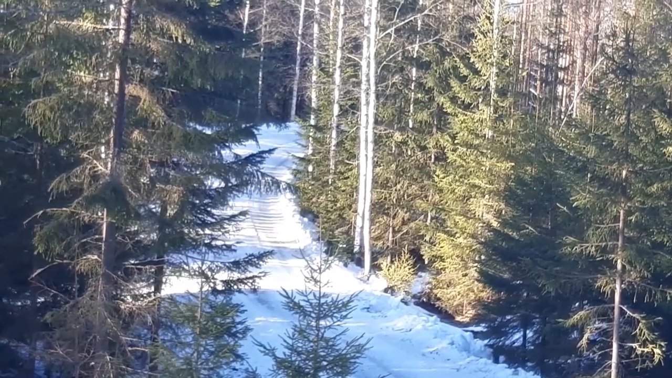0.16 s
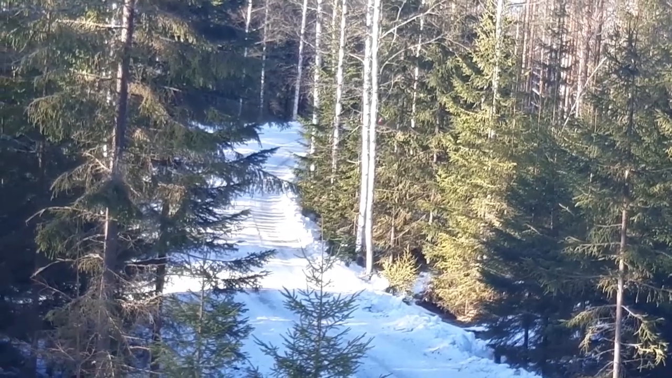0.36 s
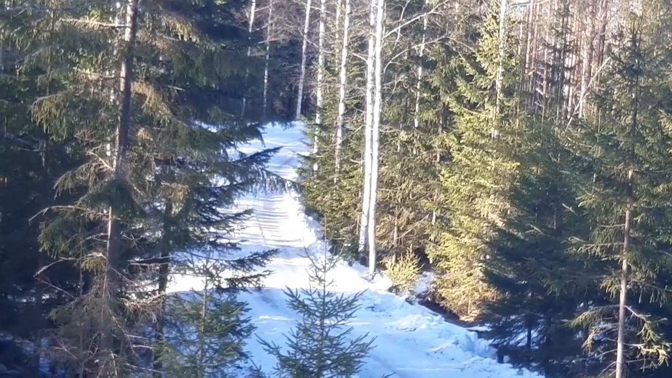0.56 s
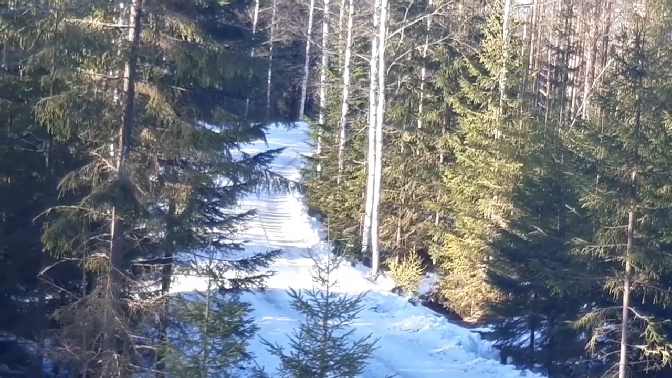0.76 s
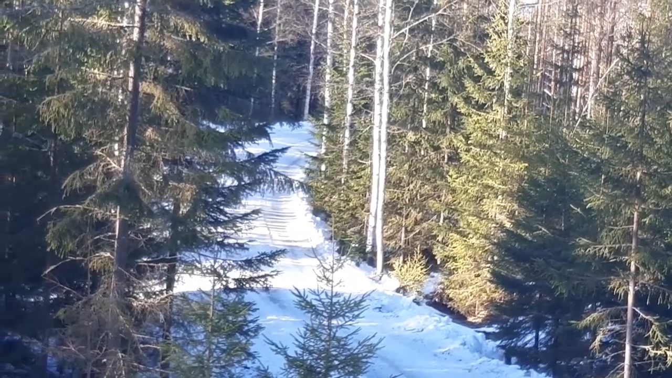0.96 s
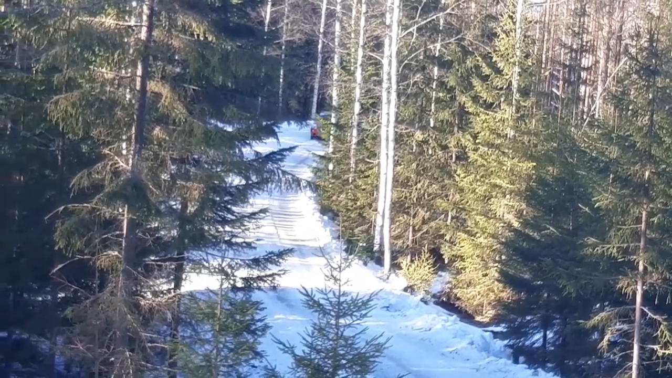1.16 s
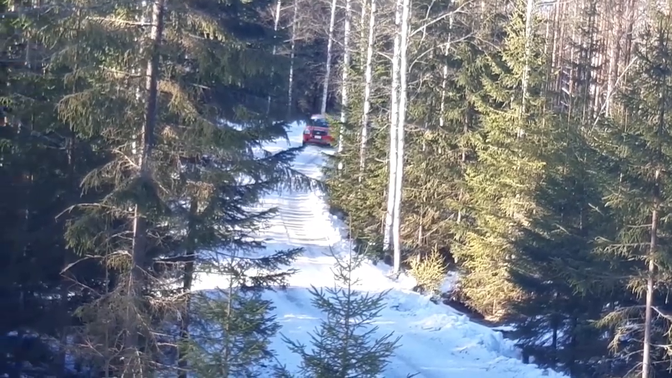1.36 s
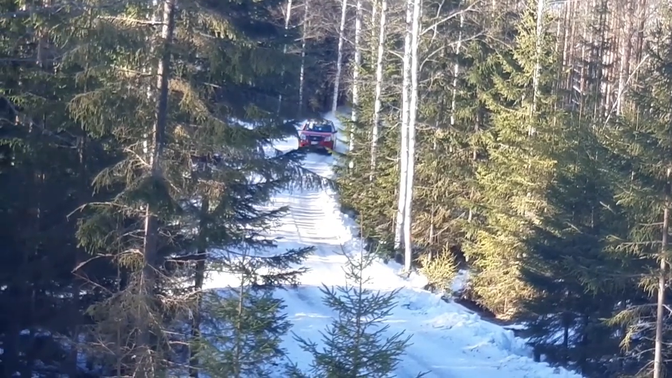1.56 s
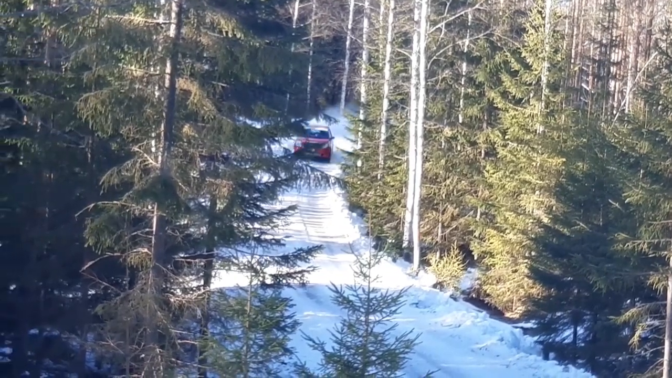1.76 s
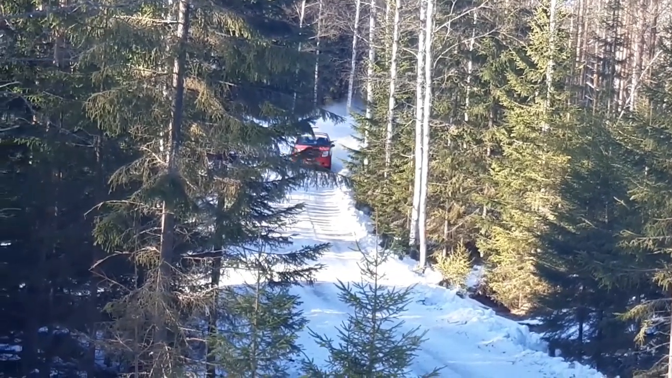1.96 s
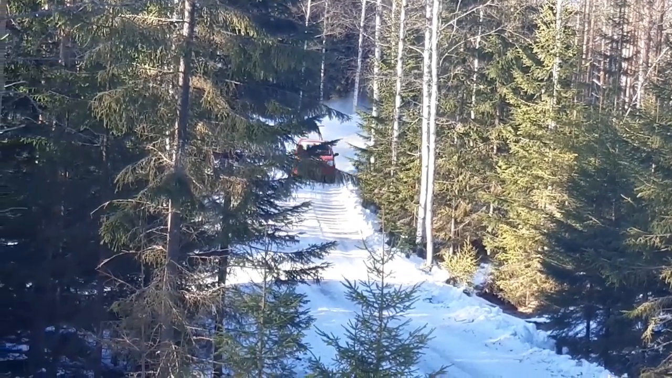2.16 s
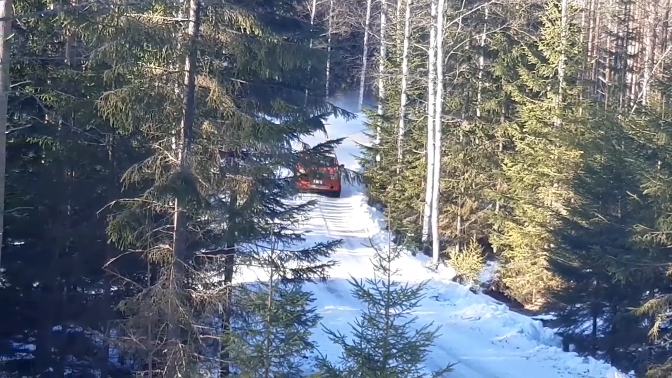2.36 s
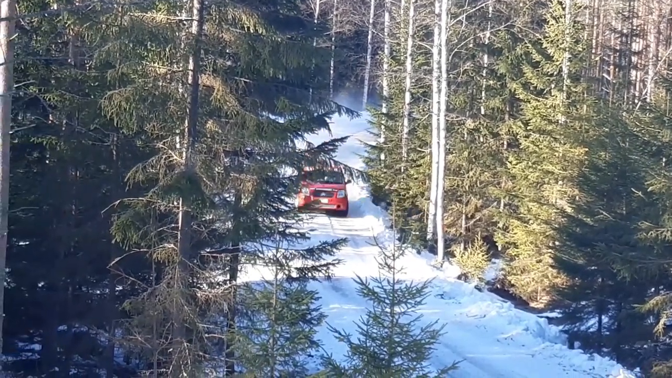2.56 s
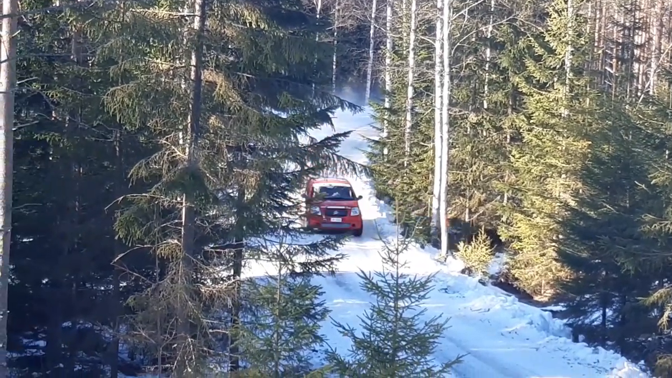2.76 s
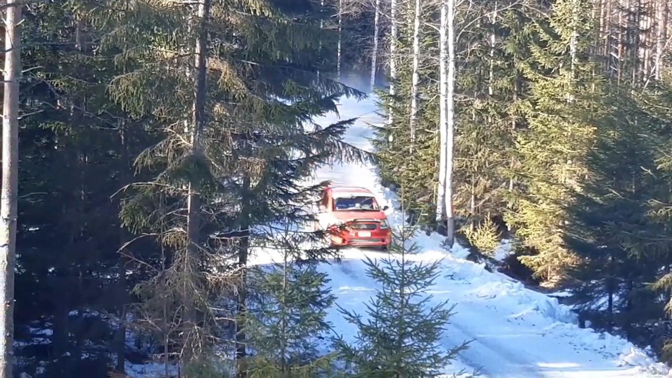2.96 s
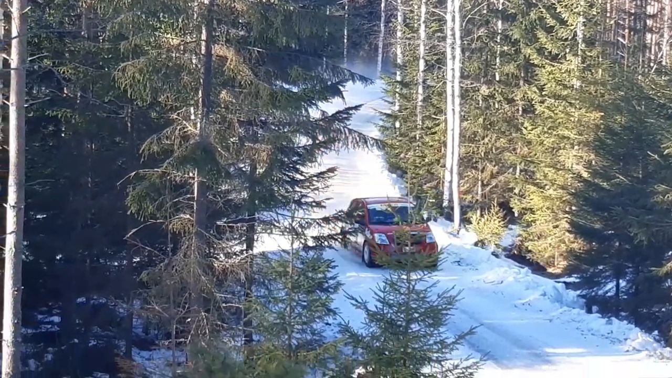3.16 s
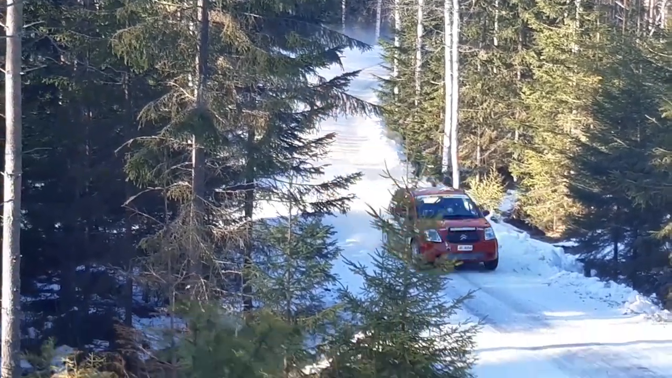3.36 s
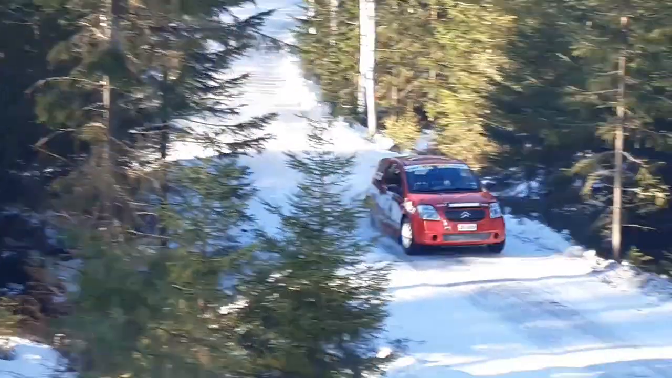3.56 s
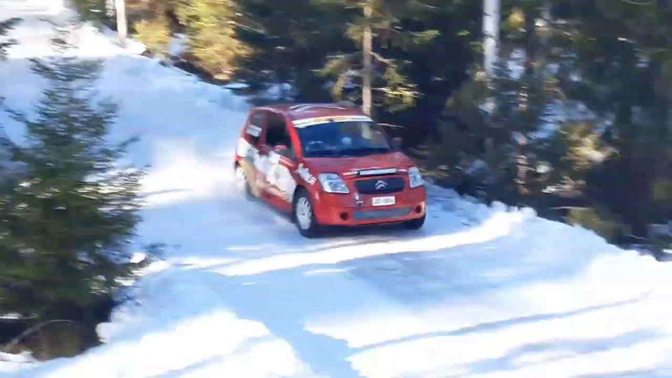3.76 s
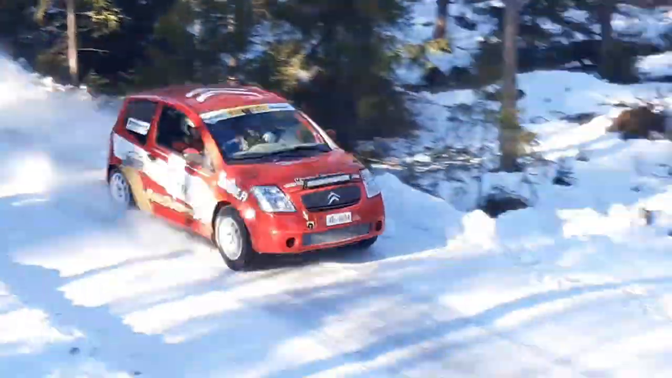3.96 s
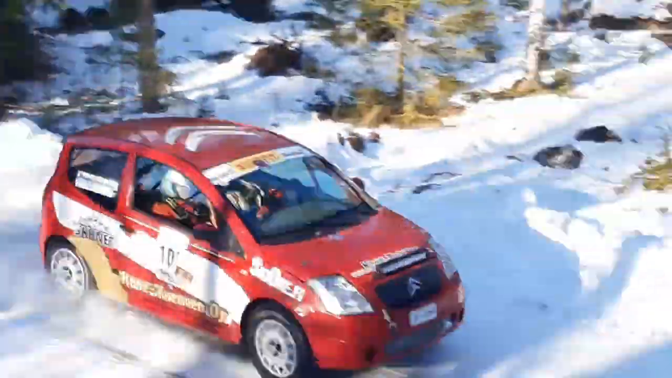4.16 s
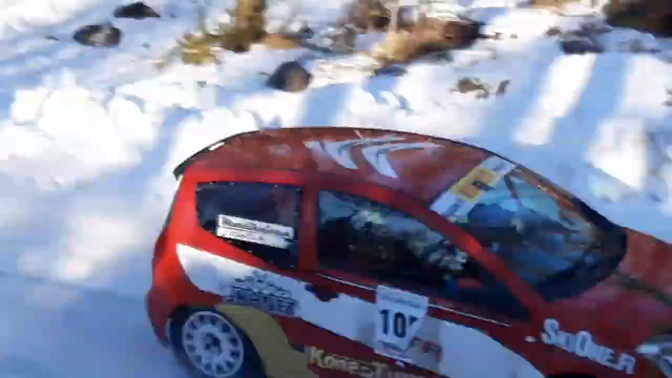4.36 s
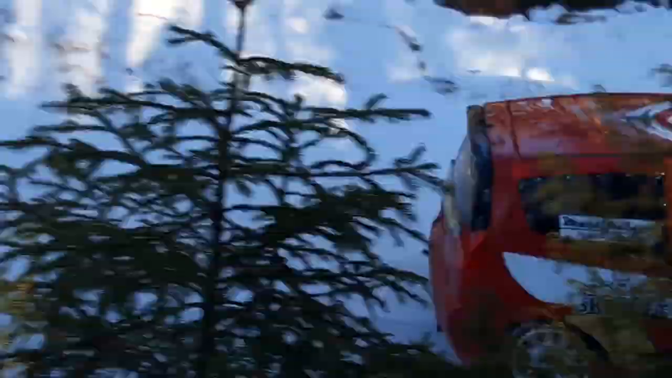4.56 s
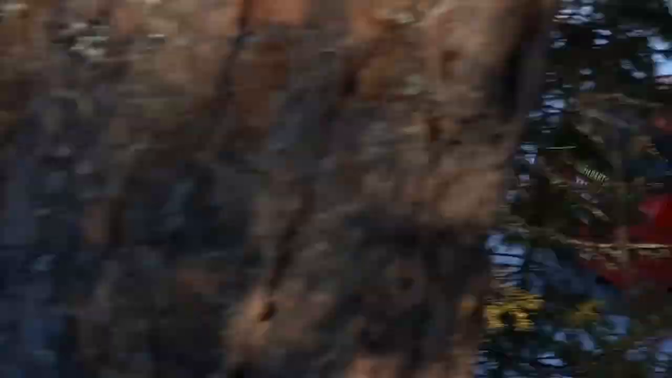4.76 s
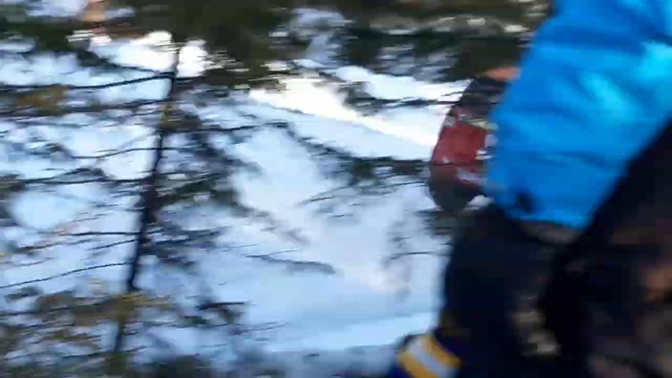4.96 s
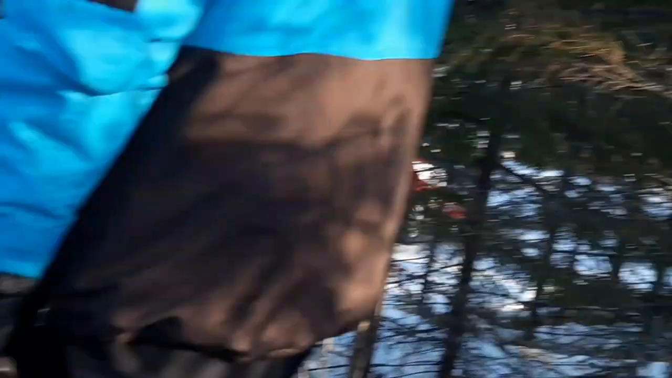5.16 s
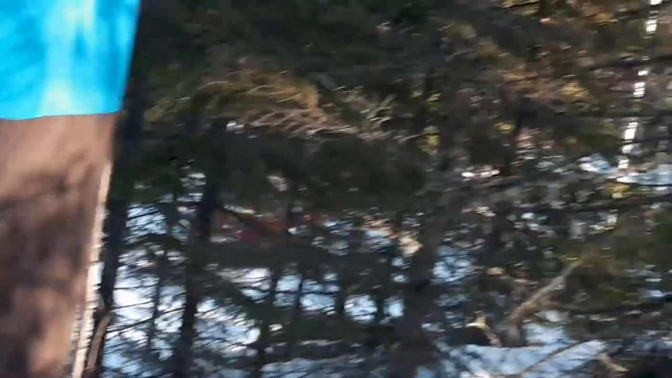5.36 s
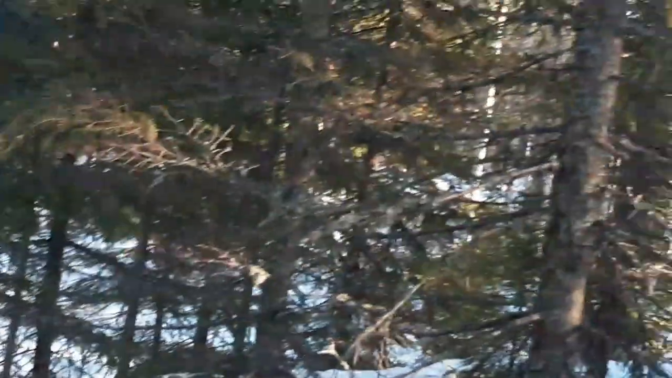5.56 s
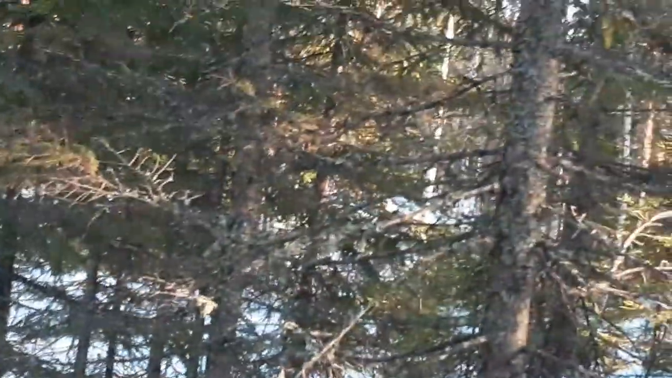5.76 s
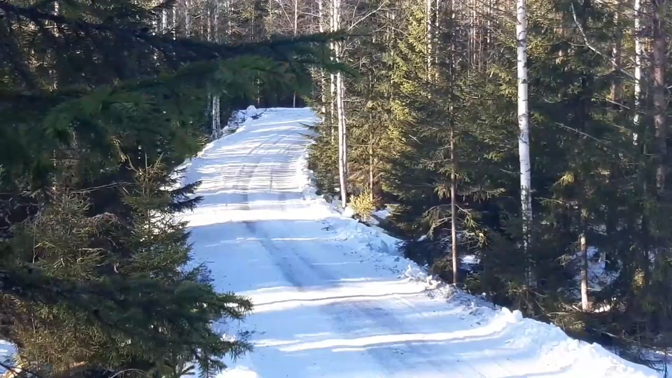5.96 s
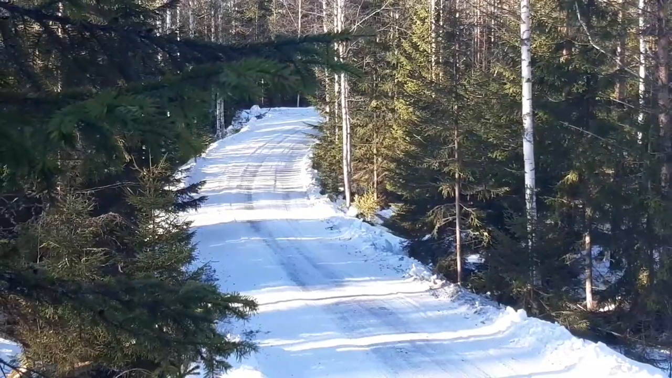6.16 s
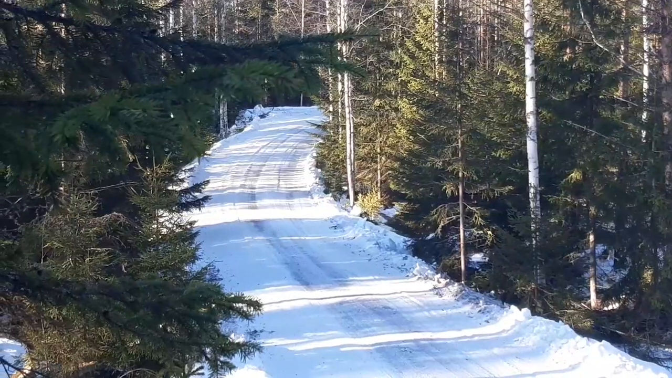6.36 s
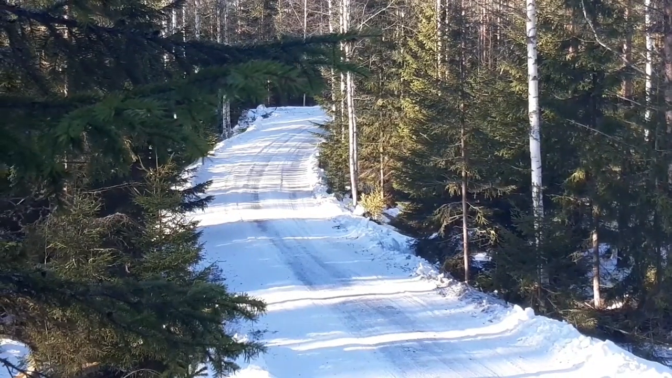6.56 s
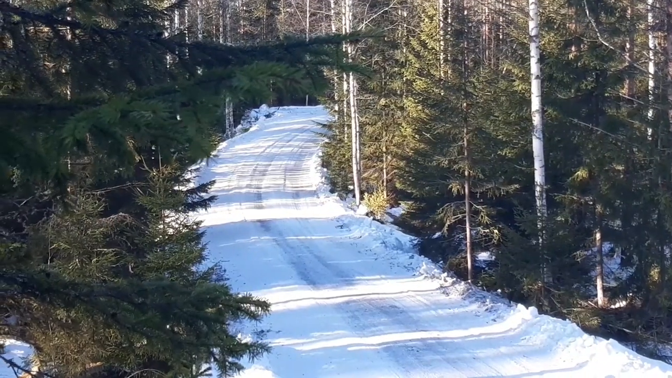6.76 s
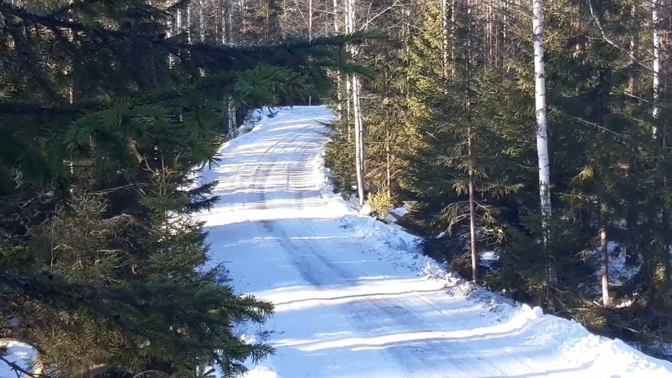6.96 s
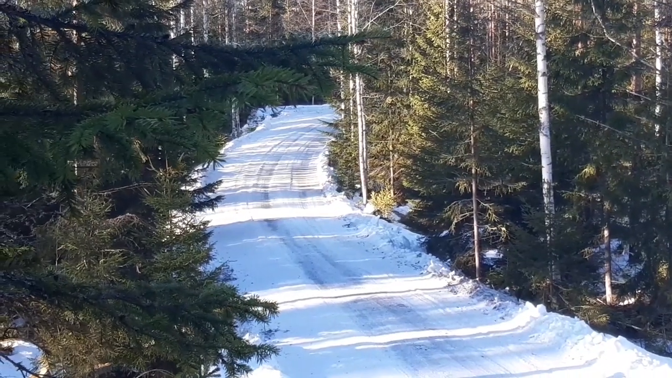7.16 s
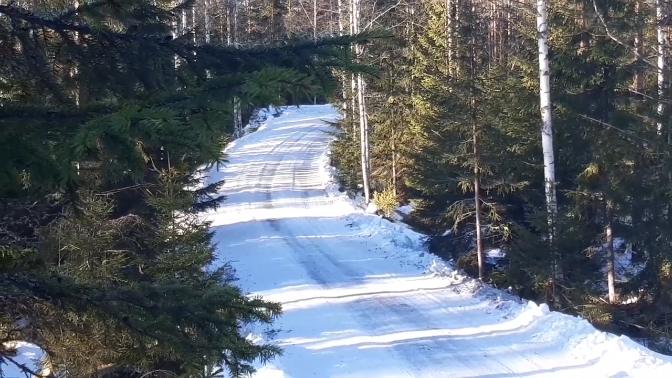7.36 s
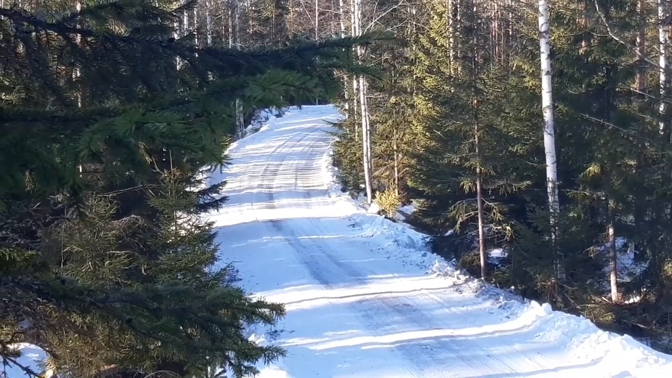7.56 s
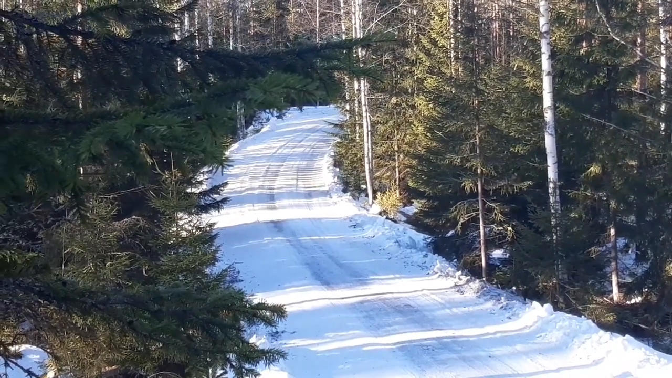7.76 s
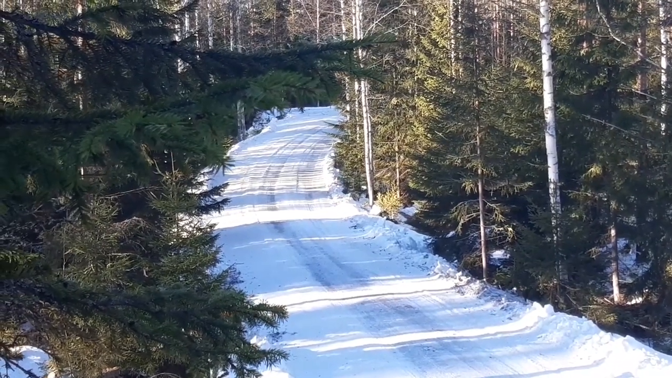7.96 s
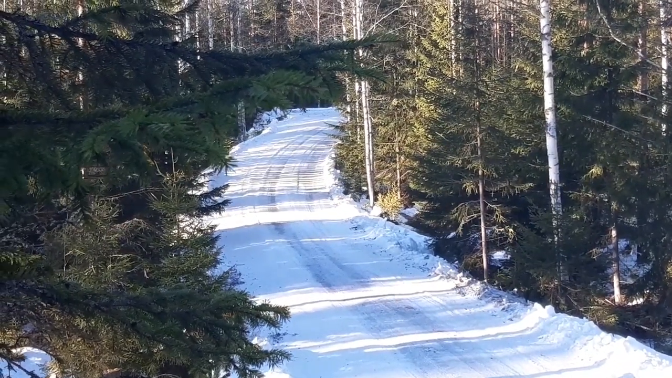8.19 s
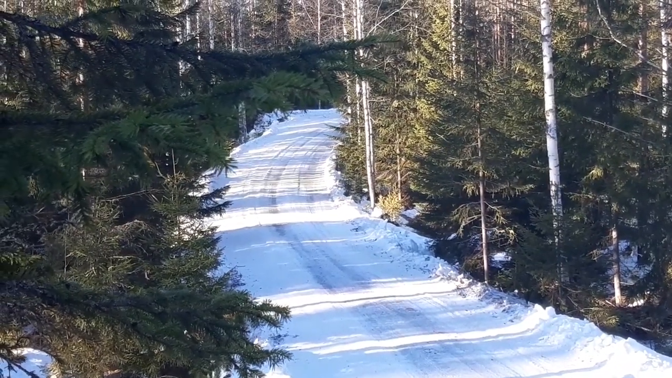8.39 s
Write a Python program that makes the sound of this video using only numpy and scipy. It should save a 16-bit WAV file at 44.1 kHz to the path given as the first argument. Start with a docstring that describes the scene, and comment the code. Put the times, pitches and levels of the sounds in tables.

```python
"""Rally car on a snowy forest road

A four-cylinder car at high revs comes up, passes close by and lifts off with exhaust pops; faint whistles at the start.
After a hard cut and a short silence, another car draws nearer, far off among the trees; clothing rustles and ticks.
Engines are sines at multiples of the firing rate plus noise roar; pops are spikes, fizz and thuds;
whistles, cloth and ticks are shaped noise. Trees, snow and road add echoes."""
import sys
import numpy as np
from scipy import signal
from scipy.io import wavfile

SR = 44100
rng = np.random.default_rng(int(sys.argv[2]) if len(sys.argv) > 2 else 0)


def log_audio(samples):
    """Write samples as a 16-bit WAV file to the path given in sys.argv[1]."""
    # one column per channel
    frames = np.atleast_2d(samples).T
    # limit to full scale, then quantise
    limited = np.clip(frames, -1, 1)
    pcm = np.round(limited * 32767).astype(np.int16)
    wavfile.write(sys.argv[1], SR, pcm)


N = 371610

# Levels are settings ahead of resonances, bounces and microphone.
# passing car, engine speed: t/s, firing rate f/Hz
PASS_FIRING_HZ = [(0, 199), (0.122, 227.3), (.25, 234.2), (.33, 223.2), (0.451, 193.3), (0.621, 170.3),
                  (0.721, 165.6), (.82, 200.6), (.95, 230.5), (1.301, 238.2), (1.5, 248.3), (1.7, 255.6),
                  (1.85, 261.7), (2.2, 261.7), (2.4, 267), (2.53, 283), (2.62, 286.4), (2.69, 284.2),
                  (2.77, 291.9), (2.85, 275.9), (2.93, 282), (3.069, 274.7), (3.33, 269.8), (3.622, 278),
                  (3.78, 291.4), (3.9, 300.8), (4.06, 298.3), (4.19, 305), (4.28, 295.4), (4.38, 279),
                  (4.5, 271.6), (4.68, 265.4), (4.78, 267.3), (4.869, 286), (4.969, 274.4), (5.14, 255.2),
                  (5.2, 262), (5.32, 277.7), (5.38, 270.5), (5.43, 254.3), (5.5, 249), (5.618, 250.4),
                  (5.791, 261)]
# passing car, firing tone at full throttle: t/s, level/dB
PASS_TONE_DB = [(0, -43.5), (.12, -40), (.24, -25), (.33, -44), (.45, -37.5), (.62, -43.5), (.75, -45),
                (.95, -23), (1.1, -34), (1.2, -30), (1.299, -21.5), (1.7, -15), (2.3, -12.5), (2.58, -7),
                (3.0, -11), (3.3, -15.5), (3.6, -11.5), (3.95, -17), (4.12, -15), (4.299, -7), (4.6, -14.5),
                (4.88, -11.5), (5.17, -16.5), (5.31, -15), (5.389, -16.5), (5.5, -22.5), (5.79, -18.5)]
# overtones as the tail pipe turns to the listener: t/s, 2nd multiple/dB, 4th/dB, higher multiples/dB, unevenness/dB
PASS_OVERTONES_DB = [(0, -62, -66, -72, -44), (.25, -35.5, -40, -66, -52), (.6, -69, -89, -66, -49),
                     (.95, -36.5, -42, -53, -60), (1.3, -43, -36, -52, -33.5), (1.6, -40, -36, -63, -36),
                     (2.1, -31.5, -47, -49, -35), (2.798, -50, -38, -43, -31.5),
                     (3.2, -26, -35.5, -51, -31), (3.6, -23.5, -36, -38, -26),
                     (3.85, -33.5, -56, -36, -22.5), (4.05, -22, -25, -32.5, -21),
                     (4.28, -19, -48, -29, -27), (4.44, -20, -33, -30.5, -25.5), (4.53, -22, -29, -27, -35),
                     (4.58, -20.5, -17.5, -25.5, -32), (4.69, -37, -26, -31, -40),
                     (4.78, -34, -18, -26.5, -43), (4.88, -39, -26, -33, -47), (5.17, -33, -43, -48, -47),
                     (5.309, -32, -58, -43, -32), (5.4, -29.5, -59, -52, -39.5),
                     (5.52, -32.5, -40, -46, -40.5), (5.79, -32.5, -39, -48, -51)]
# passing car, 3rd multiple: t/s, level/dB
PASS_THIRD_DB = [(0, -76), (.25, -36.5), (.4, -47), (.8, -44), (.95, -42), (1.2, -31.5), (1.6, -37),
                 (2.1, -29), (2.5, -34), (2.9, -38), (3.3, -37), (3.8, -41), (4.05, -24), (4.2, -35),
                 (4.4, -22), (4.52, -31), (4.58, -24.5), (4.7, -27), (4.8, -19.5), (4.88, -24.5),
                 (5.17, -35), (5.31, -31), (5.43, -35.5), (5.79, -42)]
# passing car: t/s, quarter lines above the 3rd multiple/dB, once-per-turn beat/dB
PASS_RASP_DB = [(0, -64, -61.5), (1.6, -43, -41.5), (3.1, -41, -39.5), (3.7, -39.5, -42), (4.05, -34, -28),
                (4.4, -35.5, -27.5), (4.65, -45, -54), (4.88, -51, -38), (5.2, -50, -35), (5.79, -64, -53)]
# passing car, roar: t/s, level/dB, treble/dB, bass/dB (treble and bass act as change from their own mean)
PASS_ROAR_DB = [(0, -45, -19, 9), (.14, -46, -21, 12), (0.309, -37.5, -16, 7.5), (.45, -42, -24, 8.5),
                (.8, -44, -18, 12), (.88, -37.5, -14, 13), (1.0, -34, -22, 9.5), (1.5, -30.5, -14.5, 5),
                (2.4, -32.5, -11.5, 9.5), (2.67, -29, -12, 4.5), (3.408, -29.5, -9, 5.5),
                (3.959, -21.5, -6.5, 2), (4.239, -22, -5.5, 4), (4.402, -21.5, -9, -2.5),
                (4.63, -23.5, -3.5, -1.5), (4.89, -24, -4.5, -4), (4.969, -34.5, -0.5, 7),
                (5.042, -34, 6.5, 3), (5.11, -38.5, -4, 10.5), (5.6, -34, -7, -1.5),
                (5.791, -35.5, -9, 1.5)]
# passing car, roar bands centred under 190 Hz: t/s, change/dB
PASS_DEEP_DB = [(0, 1), (.9, 1.5), (2.2, -6), (3.1, 0), (3.9, 2.5), (4.4, 2.5), (4.9, 5.5), (5.79, 6)]
# passing car: t/s, left-right difference/dB
PASS_PAN_DB = [(0, 2), (1.3, 3), (2.7, -1.5), (3.9, 3), (4.2, -4), (4.5, -0.5), (5.79, 0.2)]
# throttle shut: start t/s, end t/s, first drop/dB, last drop/dB
THROTTLE_LIFTS = [(4.884, 5.169, -9, -14), (5.318, 5.383, -12, -20)]
# passing car: t/s, clear line of sight/0-1
PASS_NEARNESS = [(0, 0.35), (.3, .4), (.4, .65), (.7, .6), (.85, .4), (1.15, 0.4), (1.5, 0.66), (2.3, .76),
                 (3.4, 0.79), (3.9, 0.76), (4.3, 0.78), (4.9, 0.8), (5.099, 0.75), (5.79, 0.88)]
# inverted bounce off the snow ahead: t/s, notch spacing f/Hz, share/0-1
SNOW_COMB = [(0, 471, 0.24), (2.4, 467.5, 0.53), (3.0, 484, 0.42), (3.5, 485, 0.48), (4.1, 534, 0.33),
             (4.3, 554, 0), (5.79, 545, 0)]
# bounce off the road under the tail pipe: t/s, peak spacing f/Hz, share/0-1
ROAD_COMB = [(0, 2600, 0), (4.301, 2660, 0), (4.42, 2000, 0.15), (4.51, 1550, 0.4), (4.581, 1253, 1),
             (4.72, 1221, 0.6), (4.881, 1291, 0.6), (5.0, 1075, 0.3), (5.2, 703, 0.1), (5.45, 613, 0.22),
             (5.79, 640.5, 0.2)]
# right channel delay, passing car: t/s, lag/samples
PASS_LAG_SAMPLES = [(0, 1), (1, 2), (3.2, 2), (4.2, 4), (5.79, 4)]
# far car: t/s, firing rate f/Hz, firing tone/dB, unevenness/dB, roar/dB
FAR_COURSE = [(5.83, 193.8, -42, -50, -56), (6.35, 195.2, -41, -43, -53), (6.501, 206.1, -44, -54, -52),
              (6.7, 211.5, -40.5, -41.5, -51), (7.099, 213.9, -55, -46, -49), (7.3, 209.3, -37, -46.5, -48),
              (7.499, 215.8, -63, -40.5, -48.5), (7.72, 215.5, -65, -36.5, -46.5),
              (7.88, 229.7, -52, -35.5, -46.5), (8.1, 224, -58, -35.5, -45), (8.3, 230, -68, -36, -44.5),
              (8.43, 237, -35, -37, -45)]
# cylinder inequality: multiple of firing rate, level/dB re unevenness
PASS_UNEVEN = [(.25, -22.5), (.75, 1.5), (1.25, -5), (1.5, -2.5), (1.75, -1), (2.25, 1.5), (2.5, -10),
               (2.75, -4)]
FAR_UNEVEN_LINES = [(1.25, 4.5), (1.5, -22), (1.75, -5.5)]
# exhaust bark: multiple of firing rate, level/dB re higher multiples
BARK_LINES = [(5, 0), (6, -0.5), (7, 3), (8, -1), (9, -7), (10, -6.5), (11, -19), (12, -4.5), (13, -8),
              (14, -6.5), (15, -6), (16, -11.5), (17, -4.5), (18, -22)]
# resonances on the engine orders: f/Hz, width/Hz, level/dB
PIPE_MODES = [(1110, 210, 0), (1737, 130, 3), (2280, 200, -0.5)]
# relative roar spectra: f/Hz, density/dB per Hz
PASS_ROAR_COLOUR = [(38, -66), (65, -24), (170, -25), (277, -7), (364, -34), (503, -12.5), (873, -21.5),
                    (1660, -23), (1910, -33.5), (2570, -30), (3240, -30), (6750, -37), (8690, -20),
                    (10400, -62.5), (15800, -42.5)]
FAR_ROAR_COLOUR = [(38, -62), (65, -14), (124, -47), (220, 1), (317, -3), (694, -17), (1000, -12.5),
                   (2950, -35), (3470, -47), (5240, -65), (7230, -46), (8490, -84), (15800, -58)]
# resonances in the roar: f/Hz, width/Hz, level/dB
PASS_BODY = [(269, 15.4, 15.5), (524, 180, 4.5), (1016, 123, 6.5), (1690, 490, 3), (2390, 530, 8.5)]
FAR_BODY_MODES = [(223.5, 6.8, 8), (402, 14, 0), (470, 23, 7.5), (667, 70, 16), (2780, 550, 4),
                  (3520, 1300, -20)]
# roar: f/Hz, left-right difference/dB
ROAR_PAN_DB = [(250, 0), (500, -1), (1000, 4), (2000, -1), (4000, 0.5), (8000, 0.5)]
# noise bands: f/Hz, left-right correlation/1
STEREO_LIKENESS = [(60, 1), (125, 1), (250, 0.99), (500, 0.67), (1000, 0.054), (2000, 0.58), (5000, 0.038),
                   (12000, 0.069)]
# unburnt fuel in the pipe: t/s, relative crack level/dB, relative thud level/dB
EXHAUST_POPS = [(4.8934, 1.5, -16), (4.9076, -1, -16), (4.933, -5, -19), (4.9403, -13, -38),
                (4.951, -7, -19), (4.9862, -13, -39), (4.999, -11, -22), (5.1695, -37, -27),
                (5.383, -28, -28.5)]
# breathy whistles of the distant car: centre t/s, f/Hz, level/dB, half length/s
CAR_WHISTLES = [(0.032, 2400, -43, 0.043), (0.3, 2580, -37.5, .05), (0.602, 2510, -39.5, 0.035)]
# cloth swells: centre t/s, level/dB, half length/s
CLOTH_SWELLS = [(6.435, -59, .02), (6.5, -64, .045), (6.676, -67, 0.019), (7.277, -60, 0.06),
                (7.555, -59, 0.066), (7.654, -52, 0.06), (7.746, -57.5, 0.048), (7.815, -62, 0.019),
                (8.294, -56, 0.032)]
# relative cloth spectrum: f/Hz, density/dB per Hz
CLOTH_COLOUR = [(1760, -40), (3000, 3), (4020, -4), (5650, -4), (7100, 3.5), (7990, -12), (8940, -56),
                (14900, 5.5), (15800, -8)]
# cloth resonances: f/Hz, width/Hz, level/dB
CLOTH_MODES = [(3380, 440, -3), (4260, 760, 7), (6400, 1300, 2.5)]
# dry ticks close by: t/s, relative level/dB, strongest f/Hz
CLOSE_TICKS = [(6.145, -56, 5700), (6.188, -46, 5700), (6.256, -47, 5600), (6.3495, -52, 5500),
               (6.422, -45, 5700), (6.436, -48, 4400), (6.578, -51, 1600), (6.6687, -43, 7000),
               (7.1771, -54, 6200), (7.4589, -53, 4500), (7.553, -52, 4190), (7.694, -35, 7100),
               (7.78, -52, 3850), (8.301, -36, 5770), (8.302, -40, 3680), (8.303, -34, 1900)]

CUT_S, RESUME_S = 5.79, 5.822
UNHEARD_DB = -90  # groups of lines that never exceed this are left out
LIFT_EDGE_S, LIFT_ROAR_SHARE = 0.012, 0.058  # the roar takes this share of the drop/dB
RELIGHT_DB, RELIGHT_S = 6, 0.008
RASP_SLOPE_DB = -1.5  # per multiple
UPPER_PAN_DB = 7  # higher multiples lean left
ROAD_ON_ROAR = 0.55  # the spread-out roar bounces less sharply than the pipe
ROAD_DULL_HZ = 5500
MIC_TOP_HZ = 16200


def car(t, controls, uneven, colour, body, level_band_hz, pivot_hz, lag, near, snow, road):
    """Engine orders on one crank phase, tree echoes and roar that throbs with the firing."""
    firing_hz, tones_db, roar_db = controls
    higher_db, pan_db = tones_db[4], roar_db[4]
    hidden = 1 - np.clip(near, 0, 1)
    tone, upper, shaken = engine_orders(firing_hz, tones_db, uneven, hidden)
    tone = resonate(tone, PIPE_MODES)
    upper = bounced(resonate(upper, PIPE_MODES), snow, road, 1)
    roar = road_roar(len(t), roar_db, colour, pivot_hz)
    roar = resonate(bounced(roar, snow, road, ROAD_ON_ROAR), body)
    level_db = roar_db[0]
    # the harder the bark, the more each firing spits
    throb = np.clip(0.16 + 0.16 * from_db(higher_db - level_db), 0, 1.4) * (1 - hidden) ** 2
    roar = roar / np.std(band(roar.mean(axis=0), *level_band_hz)) * from_db(level_db)
    roar = roar * np.exp(throb * (np.cos(shaken - 0.5) - throb / 2))
    heard = tone * sides(pan_db + 0 * t)
    heard = heard + upper * sides(pan_db + UPPER_PAN_DB + 0 * t)
    heard = heard + trees((tone + upper) * from_db(-17.5 + 7.2 * hidden), t60_s=0.46) + roar
    heard[1] = late(heard[1], lag)  # right microphone is further from the road
    edge_s = 0.0015
    return heard * np.clip(np.minimum(t - t[0], t[-1] - t) / edge_s, 0, 1)


def engine_orders(firing_hz, tones_db, uneven, hidden):
    """Sines at multiples of the firing rate; behind trees they flutter, in plain sight they are steadier."""
    size = len(firing_hz)
    first_db, second_db, third_db, fourth_db, higher_db, uneven_db, rasp_db, beat_db = tones_db
    wander = (0.0015 + 0.0201 * hidden ** 2) * drift(23.1, size)
    phase = 2 * np.pi * np.cumsum(firing_hz * (1 + wander)) / SR
    flutter_db = (0.5 + 7.8 * hidden ** 2) * drift(35, size)
    tone = np.sqrt(2) * from_db(first_db + flutter_db) * np.cos(phase)
    upper = np.zeros(size)  # above the 4th multiple

    # whole multiples in step sharpen each firing into a pulse
    whole = [(2, second_db), (3, third_db), (4, fourth_db)]
    if np.max(higher_db) > UNHEARD_DB:
        whole += [(k, higher_db + db - 10 * hidden) for k, db in BARK_LINES]
    # uneven firing times blur the high multiples
    shaken = phase + (0.015 + 0.6 * hidden ** 2) * drift(54, size)
    for k, db in whole:
        flutter_db = (0.3 + 16 * hidden ** 2) * drift(24, size)
        line = np.sqrt(2) * from_db(db + flutter_db) * np.cos(k * shaken - 0.5 * k)
        if k > 4:
            upper += line
        else:
            tone += line

    tone += np.sqrt(2) * from_db(beat_db) * np.cos(phase / 2)  # once per crank turn
    # unequal cylinders: quarter lines, each fading on its own
    quarters = [(k, uneven_db + db) for k, db in uneven]
    if np.max(rasp_db) > UNHEARD_DB:
        quarters += [(k / 4, rasp_db + RASP_SLOPE_DB * (k / 4 - 3)) for k in range(13, 38) if k % 4]
    for k, db in quarters:
        # upper lines nearly in step: one cylinder raps harder
        start = rng.uniform(0, 2 * np.pi if k < 3 else 2)
        line = from_db(db + 1.8 * drift(6.5, size)) * np.cos(k * phase + start)
        if k > 4:
            upper += line
        else:
            tone += line
    return tone, upper, shaken


def road_roar(size, roar_db, colour, pivot_hz):
    """Intake, tyre and snow noise; air and distance take the treble first."""
    _, treble_db, bass_db, deep_db, _ = roar_db
    treble_db = treble_db - treble_db.mean()
    bass_db = bass_db - bass_db.mean()
    together = drift(8.6, size)
    roar = 0
    for hz, noise in noise_bands(colour, size):
        bright = np.clip(np.log2(hz / pivot_hz) / 2.34, 0, 1.5)
        low = np.clip(np.log2(1400 / hz), 0, 1)
        change_db = bright * treble_db + low * bass_db + deep_db * (hz < 190)
        change_db = change_db + 0.23 * together + 1.03 * drift(9.0, size)
        roar = roar + noise * sides(at_hz(ROAR_PAN_DB, hz))[:, None] * from_db(change_db)
    return roar


def passing_controls(t):
    """Passing car: throttle lifts cut the tone levels; the first firings afterwards bark harder."""
    lift_db, relight_db = 0, 0
    for start, end, early_db, late_db in THROTTLE_LIFTS:
        knots = [start, start + LIFT_EDGE_S, end - LIFT_EDGE_S, end]
        lift_db = lift_db + np.interp(t, knots, [0, early_db, late_db, late_db]) * (t < end)
        relight_db = relight_db + RELIGHT_DB * np.exp(-np.abs(t - end) / RELIGHT_S) * (t >= end)
    second_db, *others_db = in_time(t, PASS_OVERTONES_DB)
    overtones_db = [second_db] + in_time(t, PASS_THIRD_DB) + others_db + in_time(t, PASS_RASP_DB)
    tones_db = [in_time(t, PASS_TONE_DB)[0] + lift_db]
    tones_db += [db + lift_db + relight_db for db in overtones_db]
    level_db, treble_db, bass_db = in_time(t, PASS_ROAR_DB)
    level_db = level_db + LIFT_ROAR_SHARE * lift_db + relight_db / 2
    roar_db = [level_db, treble_db, bass_db, in_time(t, PASS_DEEP_DB)[0], in_time(t, PASS_PAN_DB)[0]]
    return in_time(t, PASS_FIRING_HZ)[0], tones_db, roar_db


def pops():
    """Each pop is a pressure spike with a short fizz, plus a 100 Hz thud of the pipe."""
    out = np.zeros((2, N))
    t = np.arange(round(0.12 * SR)) / SR
    spike = resonate(band(np.exp(-t / 0.0001), 330, 6200), [(1171, 180, 10)])
    thud = np.sin(2 * np.pi * 100 * t) * np.exp(-t / 0.0136) * (1 - np.exp(-t / 0.0018))
    for s, crack_db, thud_db in EXHAUST_POPS:
        fizz = rms_one(band(rng.standard_normal((2, len(t))), 532, 4820)) * np.exp(-t / 0.0017)
        crack = (1.5 * spike + 0.34 * fizz) * from_db(crack_db)
        out[:, round(s * SR):][:, :len(t)] += crack + thud * from_db(thud_db + 7.0)
    return out


def whistles():
    """Noise through a 120 Hz wide band, swelling and fading."""
    t = np.arange(SR) / SR
    out = 0
    for s, hz, db, length in CAR_WHISTLES:
        breath = rms_one(band(rng.standard_normal((2, SR)), hz - 60, hz + 60))
        out = out + from_db(db) * np.exp(-((t - s) / length) ** 2) * breath
    return out


def far_controls(t):
    """The far car draws nearer: its 2nd multiple grows, its roar changes colour evenly."""
    firing_hz, tone_db, uneven_db, level_db = in_time(t, FAR_COURSE)
    nearer = (t - t[0]) / (t[-1] - t[0])
    second_db = np.interp(nearer, [0, 1], [-56, -41])
    third_db = fourth_db = np.interp(nearer, [0, 1], [-48, -71])
    beat_db = -69.5
    tones_db = [tone_db, second_db, third_db, fourth_db, UNHEARD_DB, uneven_db, UNHEARD_DB, beat_db]
    roar_db = [level_db, -14 * nearer, -7 * nearer, 11 * nearer, 1.3]  # level, treble, bass, deep, pan
    return firing_hz, tones_db, roar_db


def rustles(t):
    """Bright grainy noise: soft swells as cloth rubs, and ticks that die within milliseconds."""
    bright = sum(noise for hz, noise in noise_bands(CLOTH_COLOUR, len(t)) if hz > 2800)
    cloth = rms_one(resonate(bright, CLOTH_MODES))
    swell = sum(from_db(db) * np.exp(-((t - s) / length) ** 2) for s, db, length in CLOTH_SWELLS)
    out = cloth * (swell + from_db(-65.0)) * from_db(1.3 * drift(60, len(t)))
    after = np.arange(-200, 900) / SR
    shape = np.exp(-np.abs(after) / np.where(after < 0, 0.001, 0.004))
    for s, db, hz in CLOSE_TICKS:
        centre = round((s - t[0]) * SR)
        at = slice(centre - 200, centre + 900)
        body = rms_one(band(rng.standard_normal(len(after)), hz / 1.15, hz * 1.27))
        out[:, at] += from_db(db - 10.0) * shape * (0.41 * cloth[:, at] + 1.5 * body)
    return out


def trees(x, t60_s):
    """Scattered echoes off the trunks, other ones on each side."""
    size = int(t60_s * SR)
    sparse = rng.standard_normal((2, size)) * (rng.random((2, size)) < 0.01)
    echoes = sparse * from_db(-60 * np.arange(size) / size)
    echoes /= np.sqrt(np.sum(echoes ** 2, axis=1, keepdims=True))
    return signal.fftconvolve(x[None], echoes, axes=1)[:, :len(x)]


def bounced(x, snow, road, road_part):
    """Two ground bounces, each (spacing/Hz, share): combs whose teeth slide as the spacing changes."""
    # band-passed forward and backward to nearly cancel the filter delay
    off_snow = band(band(x, 1380, 5500)[..., ::-1], 1400, 4900)[..., ::-1]
    x = x - np.clip(snow[1], 0, 1) * late(off_snow, SR / snow[0])
    share = road_part * np.clip(road[1], 0, 1)
    # the road swallows the treble
    dull = signal.sosfiltfilt(signal.butter(2, ROAD_DULL_HZ, fs=SR, output="sos"), x)
    return x + share * late(dull, SR / road[0])


def noise_bands(spectrum, size):
    """Half-octave bands of stereo noise with the given colour, as (centre/Hz, band) pairs."""
    edges = 65 * 2 ** np.arange(0, 8.3, 0.5)
    white = rng.standard_normal((2, 2, size))  # neighbouring bands use different noise
    for k, (low, high) in enumerate(zip(edges, edges[1:])):
        mid, side = band(white[k % 2], low, high)
        hz = np.sqrt(low * high)
        alike = np.clip(at_hz(STEREO_LIKENESS, hz), 0, 1)
        stereo = np.sqrt(1 + alike) * mid + np.sqrt(1 - alike) * side * [[1], [-1]]
        yield hz, from_db(at_hz(spectrum, hz)) * stereo


def resonate(x, body):
    """Add two-pole resonances: positive dB lifts, negative dB dips."""
    out = x
    for hz, width, db in body:
        r = np.exp(-np.pi * width / SR)
        zeros = [(1 - r * r) / 2, 0, (r * r - 1) / 2]
        poles = [1, -2 * r * np.cos(2 * np.pi * hz / SR), r * r]
        out = out + (from_db(db) - 1) * signal.lfilter(zeros, poles, x)
    return out


def late(x, lag):
    """Delay by lag samples, which may change with time."""
    at = np.arange(x.shape[-1])
    rows = [np.interp(at - lag, at, row, left=0) for row in np.atleast_2d(x)]
    return np.array(rows).reshape(x.shape)


def drift(rate_hz, size):
    """Unit-rms random wander: two-pole low-passed noise, computed every 40 samples."""
    r = np.exp(-80 * np.pi * rate_hz / SR)
    noise = rng.standard_normal(size // 40 + 2002)
    slow = signal.lfilter([1], [1, -2 * r, r * r], noise)[2000:]  # drop the filter's start-up
    return np.interp(np.arange(size) / 40, np.arange(len(slow)), rms_one(slow))


def band(x, low_hz, high_hz):
    """Butterworth band-pass."""
    return signal.sosfilt(signal.butter(2, [low_hz, high_hz], "band", fs=SR, output="sos"), x)


def sides(pan_db):
    """Left and right gains of a level difference."""
    return from_db(np.array([pan_db / 2, -pan_db / 2]))


def from_db(db):
    """Decibels to gain."""
    return 10 ** (np.asarray(db) / 20)


def rms_one(x):
    """Scale to unit rms."""
    return x / np.sqrt(np.mean(x ** 2) + 1e-20)


def at_hz(points, hz):
    """Read a spectrum on a log-frequency axis."""
    table = np.array(points)
    return np.interp(np.log(hz), np.log(table[:, 0]), table[:, 1])


def in_time(t, rows):
    """Columns of a curve table read at the times t."""
    s, *columns = np.transpose(rows)
    return [np.interp(t, s, c) for c in columns]


def scene():
    """Two stretches of road with a short silence at the cut."""
    t = np.arange(N) / SR
    first, second = t[t < CUT_S], t[t > RESUME_S]
    out = pops()
    out[:, :SR] += whistles()
    out[:, :len(first)] += car(
        first, passing_controls(first), PASS_UNEVEN, PASS_ROAR_COLOUR, PASS_BODY,
        level_band_hz=(1200, 3200), pivot_hz=2440,
        lag=in_time(first, PASS_LAG_SAMPLES)[0], near=in_time(first, PASS_NEARNESS)[0],
        snow=in_time(first, SNOW_COMB), road=in_time(first, ROAD_COMB))
    far = car(
        second, far_controls(second), FAR_UNEVEN_LINES, FAR_ROAR_COLOUR, FAR_BODY_MODES,
        level_band_hz=(900, 1800), pivot_hz=1180,
        lag=22, near=0.424, snow=(1, 0), road=(1, 0))  # no ground bounces
    out[:, -len(second):] += far + rustles(second)
    return out


def record(dry):
    """The microphone housing dips near 8.6 kHz, peaks are rounded, deep bass and the top are cut."""
    dipped = dry - 0.86 * band(dry, 6640, 10650)
    rounded = 1.117 * np.tanh(dipped / 1.331)
    thinned = signal.sosfilt(signal.butter(2, 60, "high", fs=SR, output="sos"), rounded)
    return signal.sosfilt(signal.cheby2(20, 80, MIC_TOP_HZ, fs=SR, output="sos"), thinned)


dry = scene()
out = record(dry)
log_audio(out)
```